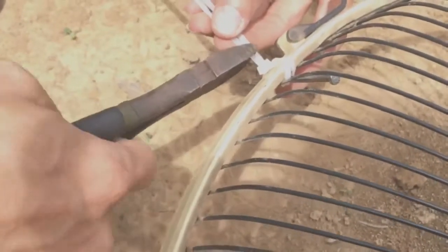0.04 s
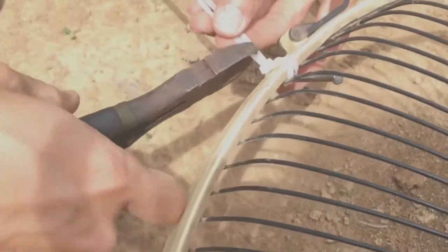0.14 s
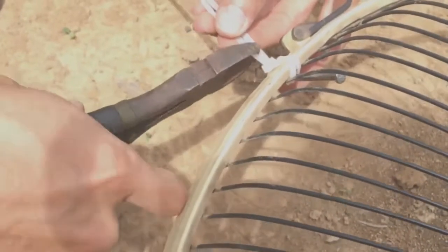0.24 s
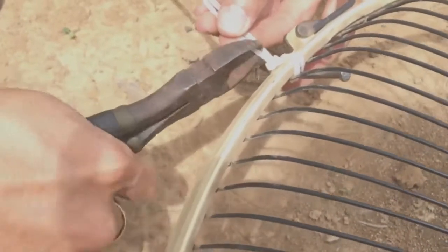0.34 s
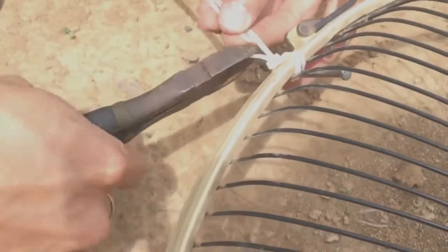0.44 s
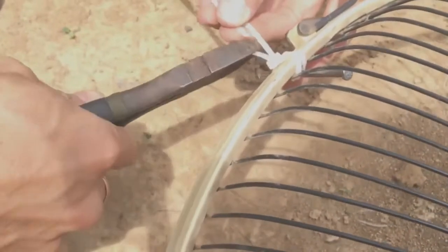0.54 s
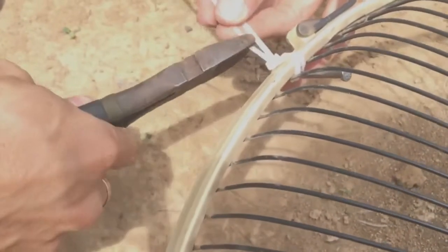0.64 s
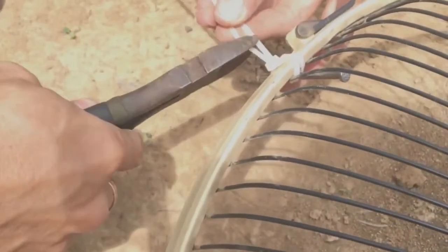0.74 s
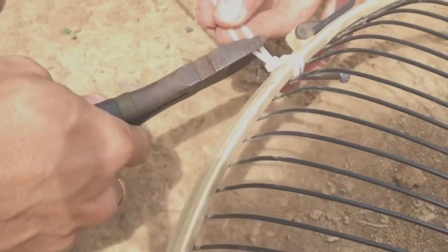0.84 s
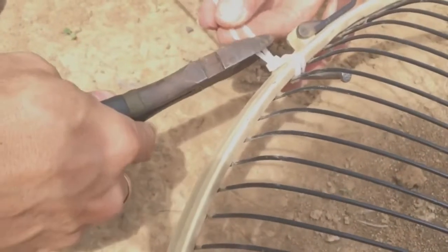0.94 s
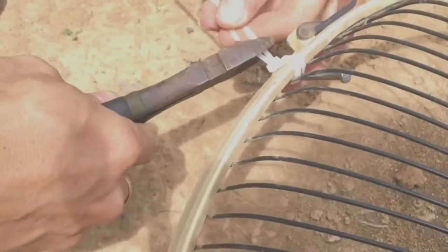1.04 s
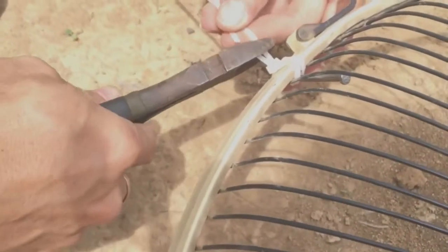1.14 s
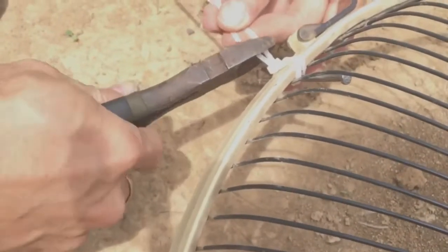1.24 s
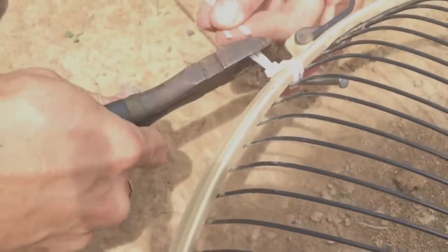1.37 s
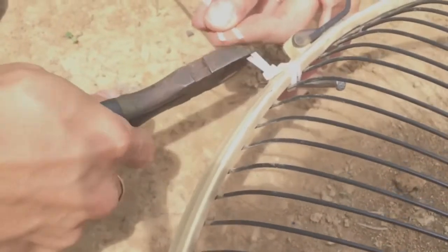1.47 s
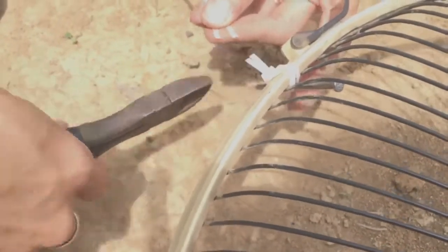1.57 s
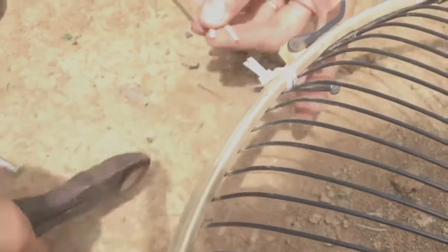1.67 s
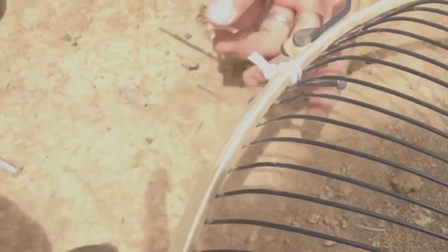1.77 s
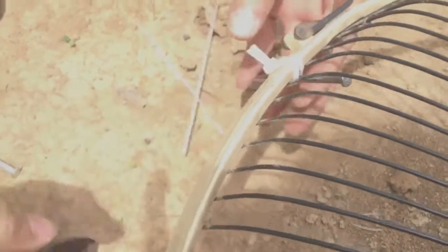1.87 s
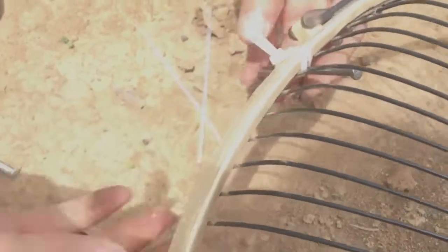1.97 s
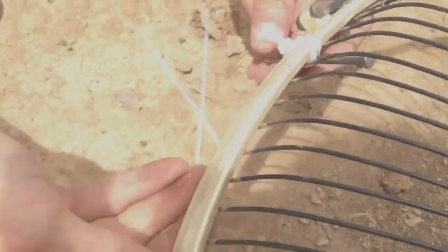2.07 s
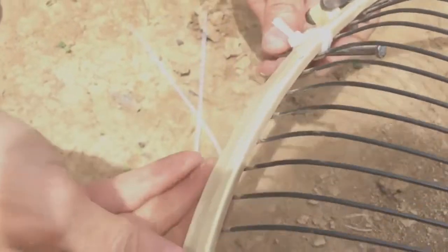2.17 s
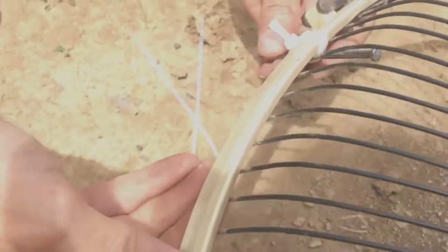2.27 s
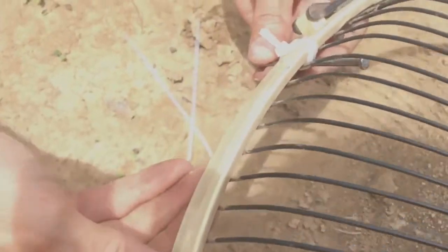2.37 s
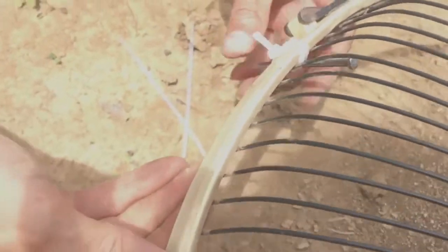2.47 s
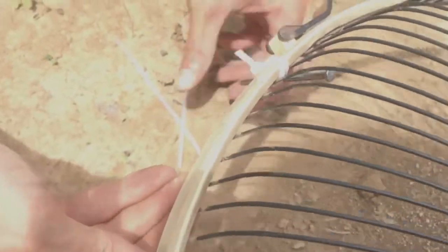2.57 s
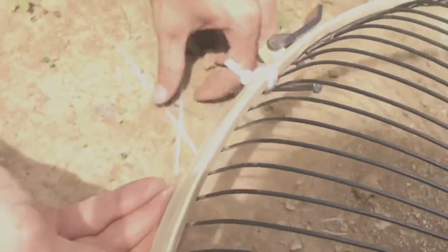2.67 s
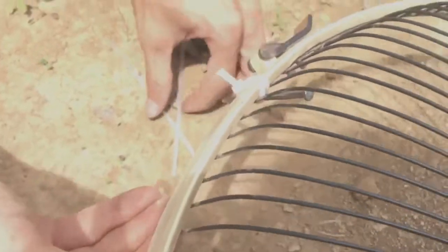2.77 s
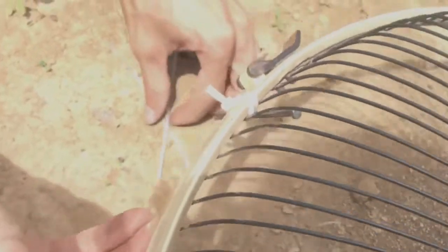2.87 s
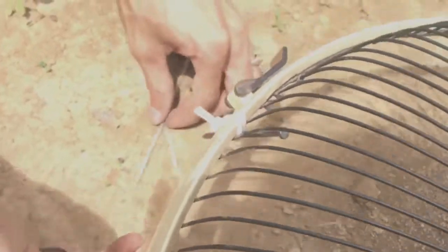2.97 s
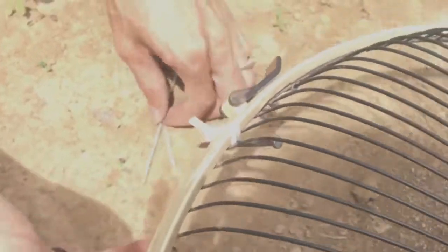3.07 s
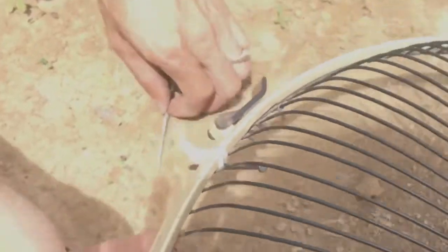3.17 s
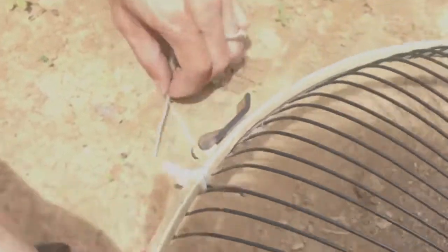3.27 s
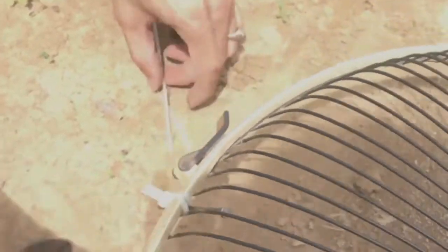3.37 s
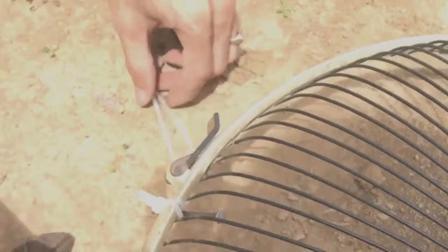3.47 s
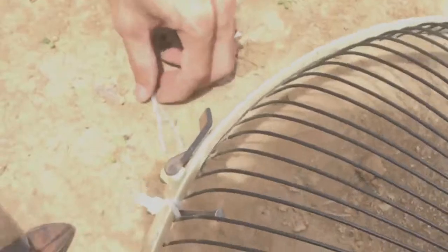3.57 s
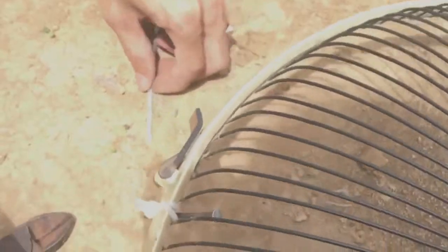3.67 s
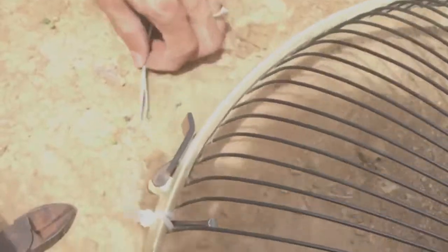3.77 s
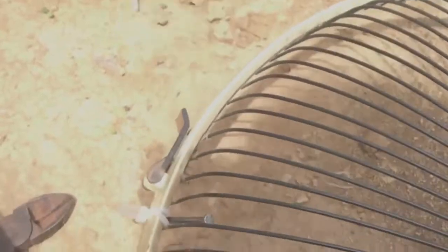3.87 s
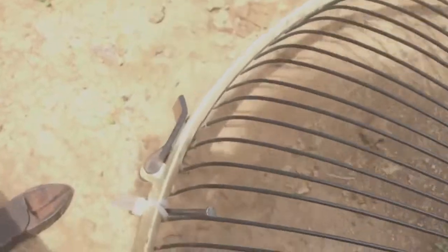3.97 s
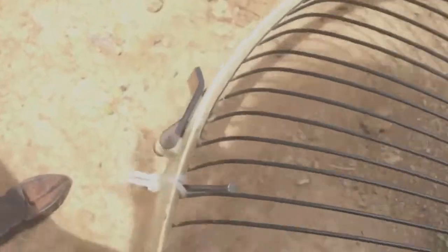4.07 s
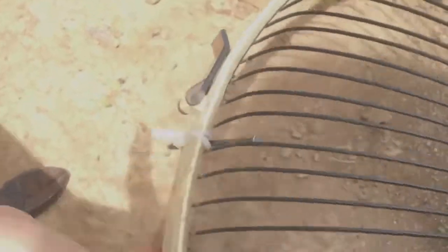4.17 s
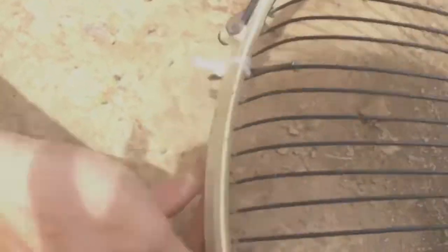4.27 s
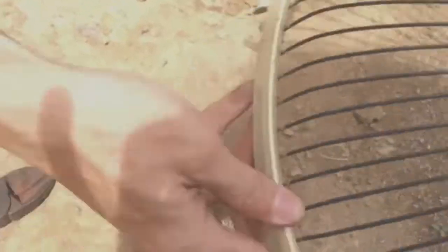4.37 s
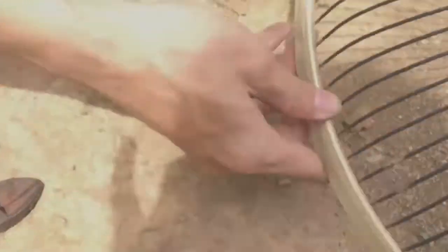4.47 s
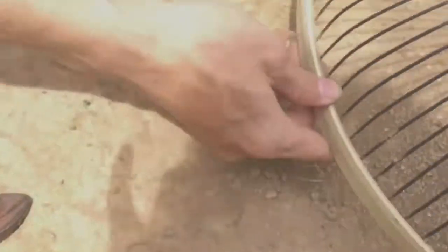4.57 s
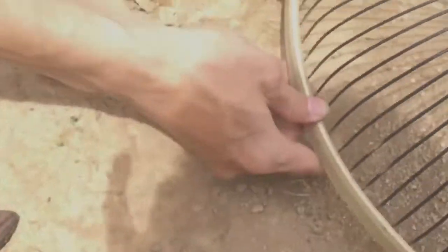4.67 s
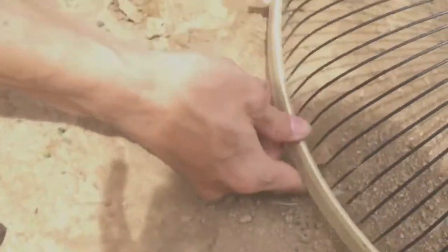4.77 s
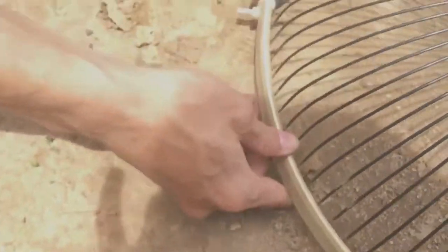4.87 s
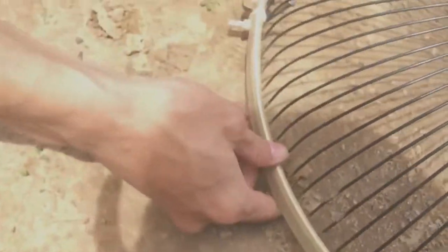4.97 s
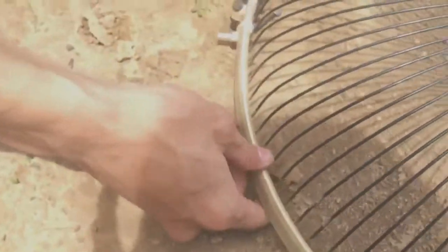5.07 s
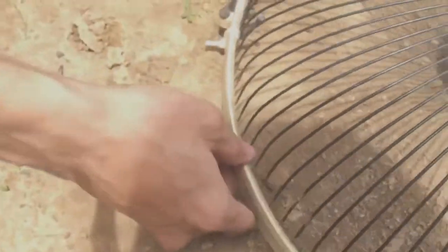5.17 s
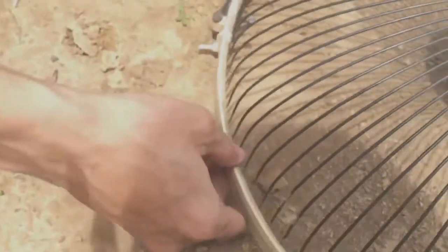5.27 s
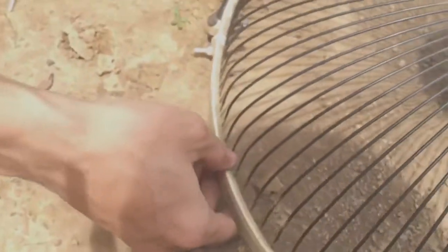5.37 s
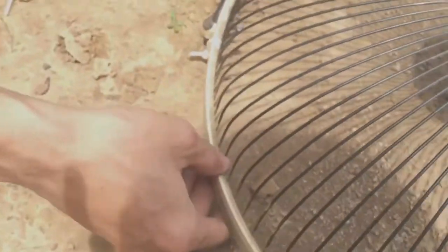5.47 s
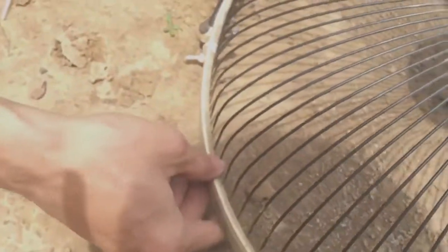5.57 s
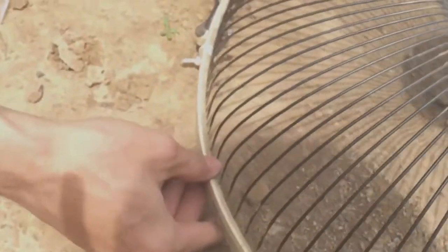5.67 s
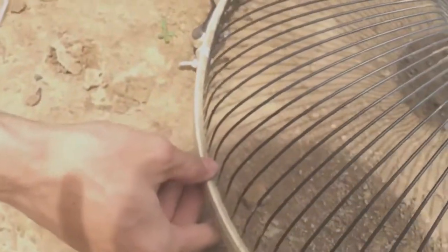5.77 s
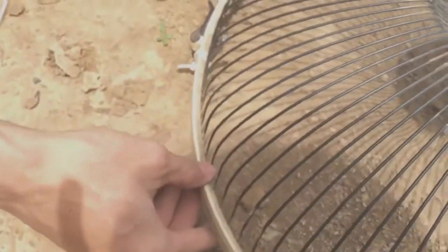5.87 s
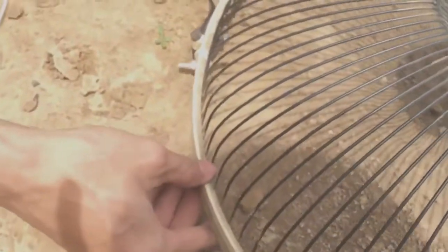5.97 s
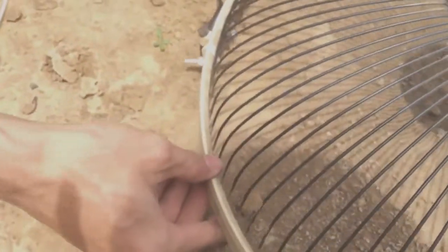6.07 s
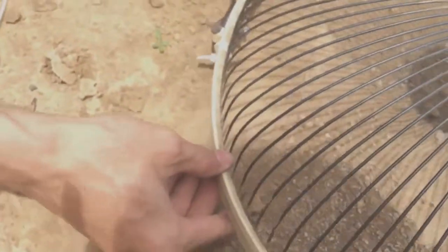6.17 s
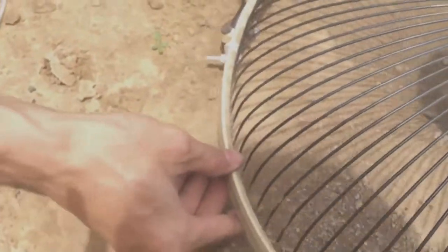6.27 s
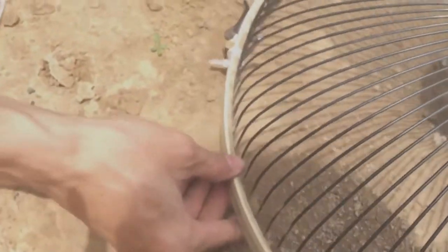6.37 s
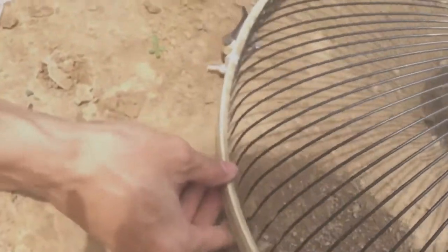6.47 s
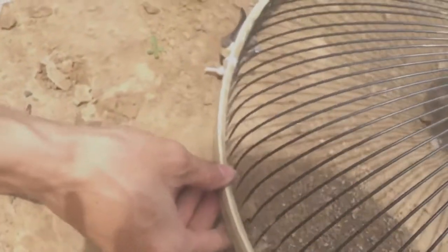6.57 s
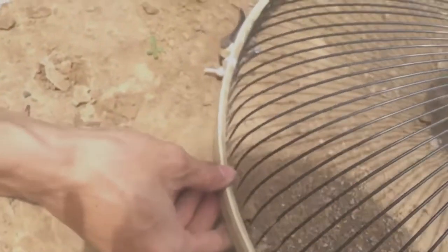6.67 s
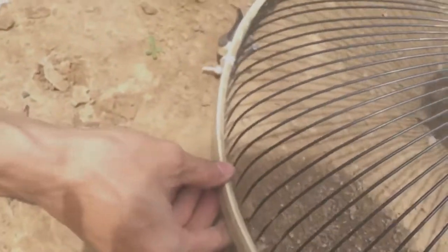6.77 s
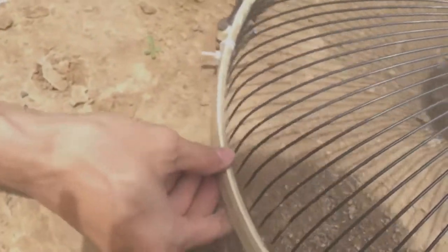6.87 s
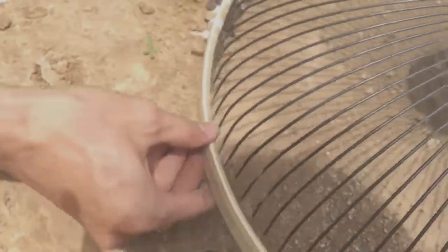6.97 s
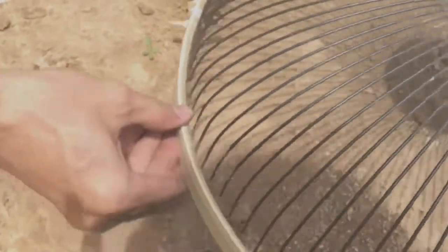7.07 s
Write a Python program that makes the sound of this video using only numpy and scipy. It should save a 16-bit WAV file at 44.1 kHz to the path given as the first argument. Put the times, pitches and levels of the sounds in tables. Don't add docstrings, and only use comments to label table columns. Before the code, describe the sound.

Close outdoor handling: cutters crack twice through plastic tie tails, the tool lands on soil, and a wire guard scrapes across grit above distant droning.

```python
import sys
import numpy as np
from scipy import signal
from scipy.fft import rfft, irfft
from scipy.io import wavfile
from scipy.ndimage import uniform_filter1d

SR = 44100
rng = np.random.default_rng(int(sys.argv[2]) if len(sys.argv) > 2 else 0)


def dump_mix(stems):
    frames = np.atleast_2d(stems).T
    limited = np.clip(frames, -1, 1)
    pcm = np.round(limited * 32767).astype(np.int16)
    wavfile.write(sys.argv[1], SR, pcm)


def voltage_ratio(decibels):
    exponent = np.asarray(decibels, float) / 20
    return 10 ** exponent


N = 313992
T = np.arange(4096) / SR

# start_s, peak_db, chatter_s, chatter_db, creak_db
SNIPS = [
    (0.3617, .4, .0046, -2.5, -27),
    (1.4213, .5, .0045, -4.5, -31),
]
# delay_s, level_db
REBOUNDS = [
    [(.00222, -8), (.003552, -3)],
    [(.001452, -10), (.002904, -9)],
]
# steel_db, snap_db, plastic_db, lowest_steel_hz
SNIP_MIX = [
    (-1, -5, -4, 1300),
    (-3, -4, -2.5, 960),
]
# pitch_hz, width_hz, level_db
JAWS = [
    [(1400, 115, -4), (1850, 260, -8), (2262, 130, -7), (3700, 150, -6), (5600, 200, -1), (6940, 200, -11),
     (7750, 300, -3), (8410, 200, -2), (9600, 200, -7), (9010, 170, 4), (10000, 150, -10.5),
     (11600, 130, -12.5), (12600, 110, -14), (15660, 130, -20)],
    [(1180, 400, -10), (1990, 120, 4.5), (2200, 110, -1), (3960, 110, -11), (4450, 250, -13),
     (5960, 210, -5.5), (6930, 200, -8), (8200, 300, -3), (8950, 190, -3), (9650, 280, -3),
     (10800, 180, -12.5), (12600, 300, -1), (13030, 320, 4.5), (15500, 100, -12.5)],
]
# pitch_hz, level_db (per Hz)
PLASTIC = [
    [(520, -27), (1150, -36), (1390, -22), (1650, -17), (2290, -9), (2870, -23), (3670, -6.5), (5210, -21),
     (5510, -7), (8450, -7.5), (9020, -1), (10400, -12), (12500, -5), (15600, -12), (17000, -25)],
    [(800, -36), (1100, -6), (1640, -15), (1980, 0.5), (2290, 0.5), (2850, -22), (3990, -5.5),
     (4900, -20.5), (5740, -10.5), (7200, -10), (8200, -1), (9520, -4), (11300, -22), (12700, -5.5),
     (14500, -16), (15500, -12), (16200, -31.5), (17000, -50)],
]
# rim_db, wires_db
SNIP_SHAKE = [
    (-70, -55),
    (-41.5, -55),
]

# pitch_hz, level_db, t60_s
RIM = [(998, -1, .22), (1064, 1, .19), (1140, 1, .09), (1330, -1, 0.07), (1870, -7, 0.25), (2030, -10, 0.2)]
# pitch_hz, level_db, t60_s
WIRES = [(3960, -7.5, .6), (4047, -7.5, .6), (5220, -8, 0.35), (5450, -10, 0.22), (6620, -13, 0.21),
         (7970, -12, 0.14), (8300, -12.5, .3)]

# start_s, peak_db, centre_hz, bright_edge_db
TICKS = [(.3382, -34, 8994, 0), (.4764, -27, 5600, 5), (.3583, -32, 8500, -3), (1.389, -55, 11000, 0),
         (1.4055, -46, 10000, 0), (.0428, -52, 1770, -8), (.0712, -53, 6000, 0), (.3217, -55, 4000, -8),
         (.1905, -47.5, 2600, -16), (.4174, -48, 3960, -8), (.5314, -48, 3960, -8), (.8995, -42, 3600, -6),
         (1.0464, -51, 2500, -10), (1.168, -53, 2600, -13), (1.8448, -41, 3830, -1.5),
         (1.8664, -52, 8000, -2), (1.9599, -43, 2000, -5), (2.0155, -42, 1810, -8), (2.0244, -46, 7000, 0),
         (2.0994, -51, 1626, -8.5), (2.4189, -47, 3940, 1), (2.4368, -45, 3950, -6.5),
         (2.4474, -46.5, 3750, -3), (2.6409, -42, 3900, -2), (2.6559, -44, 1640, -13),
         (2.989, -45.5, 1920, 2), (3.1343, -49, 3500, 0), (3.994, -51, 8000, 0), (4.499, -50, 9000, 0),
         (4.684, -52, 10000, 0), (4.998, -51, 9500, 0), (5.414, -56, 9500, 0), (6.616, -54, 10000, 0),
         (6.71, -55, 10000, 0), (2.898, -56, 9000, 0), (3.049, -57, 9000, 0), (4.1175, -41, 3700, -8),
         (4.326, -29.5, 3970, -5), (4.3547, -28, 3500, -4), (4.8965, -53, 1550, -7.5),
         (5.433, -55, 5000, -3), (5.963, -57, 3600, -11)]
# start_s, peak_db, centre_hz,
# bright_edge_db
SNAGS = [(3.4288, -49, 1860, -8), (3.46, -47, 3600, -6), (3.757, -40, 3760, -12), (3.578, -46, 5000, -4),
         (3.601, -44, 1900, -14), (3.622, -43, 1800, -14), (3.647, -42, 3900, -13), (3.688, -43, 3600, -13),
         (3.714, -43, 3400, -13), (3.792, -44, 2500, -10), (4.0512, -47, 1500, -12),
         (4.0732, -45, 5000, -8), (4.0986, -43, 1800, -10), (4.1625, -42, 6000, -6),
         (4.2208, -39, 7500, -6), (4.2782, -42, 1300, -8), (4.3, -39, 1600, -8), (4.344, -33, 1100, -12),
         (4.365, -31, 1150, -12), (4.122, -41, 1400, -8), (4.172, -41, 3800, -2), (4.214, -36, 1050, -14),
         (4.2034, -42, 1200, -8), (4.381, -32, 5500, -2), (4.404, -37, 2000, -8), (4.4418, -42, 5000, -6)]
TICK_T60_S, T60_S_PER_BRIGHT_DB = .015, .001
TICK_RING_DB, RING_DB_PER_BRIGHT_DB = -36, .6

# start_s, peak_db, pitch_hz, t60_s, contact_s
THUDS = [
    (.3635, -31, 430, .02, .0002),
    (.363, -31, 630, .02, .0002),
    (1.4229, -36, 340, .015, .0003),
    (0.364, -21, 255, .028, 0.00033),
    (1.4229, -26, 213, .03, 0.0005),
    (1.854, -30, 150, 0.037, .001),
    (1.918, -23.5, 172, 0.045, 0.0004),
    (2.015, -31, 186, .05, .0005),
    (2.0203, -23.5, 186, 0.055, 0.00049),
    (2.641, -38, 200, 0.062, 0.0015),
]
# start_s, peak_db, pitch_hz, t60_s, contact_s
RECOIL = (.3635, -21, 62, .055, .0004)
# start_s, peak_db, t60_s
LAY_DOWN = (1.9111, -20, 0.027)
# pitch_hz, level_db (per Hz)
STONE = [(290, -35), (500, -16), (1570, -14), (1950, -12), (2220, -4), (2680, -7.5), (3330, -21.5),
         (3630, -14), (4320, -34), (4710, -23.5), (6870, -23), (8530, -31.5), (15900, -40)]
# start_s, pitch_hz, level_db, t60_s
SHORT_RINGS = [(.478, 1990, -51, .07), (.478, 2250, -47, .03), (4.356, 3500, -38, .04), (1.912, 1350, -32, .025),
               (1.912, 930, -36, .025), (1.912, 700, -37, .025), (1.912, 420, -36, .02), (1.868, 2850, -61, .09),
               (1.848, 2850, -57.5, 0.18), (1.912, 2220, -30, .02), (1.912, 3700, -57.5, 0.088)]
# start_s, pitch_hz, level_db, t60_s
NUDGES = [(4.43, 360, -47, 0.12), (7.07, 1060, -48, 0.08), (2.655, 1400, -45.5, 0.0067),
          (5.38, 2500, -57, .01), (5.39, 2050, -57, .01), (5.51, 1450, -53, 0.03), (4.58, 9550, -66, .015),
          (4.64, 9550, -64, .012), (4.65, 3050, -63, .04), (5.18, 4020, -70, .4), (5.96, 4050, -71, .02),
          (0.066, 866, -47, 0.015), (.155, 800, -52, .012), (.225, 1050, -50, .012), (.225, 2050, -54, .01),
          (.212, 4000, -56, .005), (.13, 5300, -64, .006), (5.42, 1700, -57, .008)]

# peak_s, level_db, fade_20db_s, rim_pressure_db
BRUSHES = [(0.0, -71, .02, -14), (.046, -66, .045, -9), (.39, -64.5, .25, -10), (.485, -66, .12, -14),
           (.895, -69, .25, -9), (1.045, -72.5, .18, -13), (1.171, -69, .04, -8), (1.45, -60, .2, -4),
           (1.865, -65, .05, -11), (1.962, -66, .055, 0), (2.023, -67, .045, -12), (2.099, -66, .15, -3),
           (2.23, -61.5, .06, -9), (2.449, -64, .03, -10), (2.997, -70, .04, -10), (3.143, -69, .12, -10),
           (4.47, -63, .14, -12), (2.645, -63, .04, -7), (3.31, -66, .05, -12), (5.76, -82, 1.2, -11),
           (5.19, -76, .07, -12), (6.86, -75, .09, -9.5), (6.92, -78.5, .2, -8), (7.12, -72, .05, -10)]
BRUSH_RISE_S = .03
# start_s, length_s, level_db, rim_pressure_db, fine_dust_db
SLIDES = [(.152, .025, -69, -10, -2), (.226, .028, -61, -8, -4), (.065, .03, -74, -8, -3),
          (.54, .2, -69, -8, -7), (1.28, .12, -76, -5, -4), (1.6, .23, -68, -5, -6.5),
          (2.18, .04, -71, -8, -5), (2.42, .02, -70, -11, -7), (2.55, .08, -73, -7, -5),
          (2.68, .05, -75, -7, -8), (2.86, .46, -70.5, -13, -4), (4.62, .14, -70, -15, -1),
          (4.8, .08, -76, -14, -1), (4.9, .14, -71, -12, -1), (5.1, .2, -76, -10, -3),
          (5.36, .1, -80, -13, -4), (6.5, .22, -72.5, -8, -1), (7.03, .08, -82, -10, -3)]
SLIDE_SWELL_S, SLIDE_FADE_S = .035, .06
# time_s, level_db, rim_pressure_db
DRAGS = [
    [(3.38, -70, -16), (3.44, -62, -8), (3.5, -58, -12), (3.604, -52, -12), (3.7, -52, -13),
     (3.776, -52.5, -11), (3.85, -59, -8), (3.96, -72.5, -6.5)],
    [(3.96, -72.5, -6.5), (4.116, -53.5, -15), (4.195, -60, -9), (4.212, -51, 4), (4.276, -51.5, 0),
     (4.358, -42, -.5), (4.426, -56, 3), (4.457, -55, -12), (4.466, -68, -12)],
]
BRUSH_FINE_DB, DRAG_FINE_DB = -6, -5
# pitch_hz, level_db (per Hz)
GRIT = [(880, -35.5), (1500, -5), (1960, 0.5), (2480, -8.5), (2990, -8), (3510, -1.5), (4490, -4.5),
        (5010, -8.5), (5750, -4.5), (7510, -9), (9600, -7), (10300, -12), (11000, -8), (14300, -6.5),
        (15900, -15)]
# pitch_hz, width_hz, level_db
SINGING = [(1110, 200, -15), (1400, 200, -18), (1980, 250, -13), (3530, 300, -13), (4000, 200, -17),
           (4500, 350, -13), (5630, 350, -13), (6580, 500, -15), (8750, 1200, -12), (11700, 1200, -14),
           (13500, 2500, -11)]
CATCH_DB, CATCH_HZ = 5, 50

# centre_s, half_length_s, level_db, pitch_hz
INSECTS = [(3.32, .06, -72, 8050), (5.35, .05, -71, 8200), (5.58, .06, -71.5, 7980), (5.78, .06, -79, 7600),
           (5.93, .08, -79, 8150), (6.17, .08, -80, 8100), (6.42, .06, -80, 8150), (7.1, .05, -75, 7980)]
INSECT_RISE_HZ_PER_S = 2000
# start_s, length_s, level_db, start_hz, end_hz, slur_s
BIRD = (5.876, .08, -73, 3550, 4060, .011)
BIRD_WAVER_DB, BIRD_WAVER_HZ, BIRD_FADE_S = 5, 28, .09

# pitch_hz, level_db (per Hz)
DRONE = [(11, -45.5), (18, -15.5), (32, 0), (54, 1.5), (119, -5), (141, -9), (183, -10), (383, -28),
         (421, -31.5), (450, -28.5), (580, -57), (990, -120)]
# pitch_hz, width_hz, level_db
HUM = [(50.5, 13, -51.5), (83.6, 14, -53), (120.7, 12, -52.5), (200, 43, -60)]
# pitch_hz, width_hz, level_db, centre_s, half_length_s
WHINE = (474, 26, -67, 6.13, 0.24)
# time_s, level_db
LOAD = [(0.0, -45), (0.2, -44), (0.38, -48), (0.55, -48), (0.75, -43), (1.33, -48), (1.96, -43),
        (2.28, -46), (2.83, -44), (3.29, -46), (3.79, -44.5), (5.21, -46), (5.47, -45), (6.25, -42.5),
        (6.56, -46), (7.12, -45)]
DEEP_SHARE, UPPER_SHARE, UPPER_FADE_DB_PER_S = .9, .7, .95
# pitch_hz, level_db (per Hz)
AIR = [(150, -29), (250, -3), (428, -12.5), (459, -11.5), (606, -11), (953, -12.5), (1130, -15.5),
       (1260, -12.5), (2230, -20), (2610, -27.5), (6670, -39.5), (7530, -34.5), (9700, -38), (10300, -44),
       (11000, -38), (15900, -36.5)]

GAP_SHARE, GAP_DB, GAP_S, QUIET_DB = .4, -10, .003, -66
TOP_HZ = 15800


def level(x, db):
    return x * voltage_ratio(db) / np.sqrt(np.mean(x ** 2))


def peak(x, db):
    return x * voltage_ratio(db) / np.abs(x).max()


def add(out, x, s):
    i = int(s * SR)
    out[i:i + len(x)] += x[:len(out) - i]


def curve(table):
    s, *columns = np.transpose(table)
    return [np.interp(np.arange(N) / SR, s, c) for c in columns]


def walk(rate):
    k = int(SR / rate)
    steps = np.repeat(rng.standard_normal(N // k + 1), k)
    return 1.3 * uniform_filter1d(uniform_filter1d(steps, k), k)[:N]


def colour(x, shape):
    hz, db = np.transpose(shape)
    grid_hz = np.linspace(1, SR / 2, 4097)
    log_gain = np.interp(np.log(grid_hz), np.log(hz), db) * np.log(10) / 20
    cep = irfft(log_gain)
    cep[1:len(cep) // 2] *= 2
    cep[len(cep) // 2 + 1:] = 0
    response = irfft(np.exp(rfft(cep)))
    return signal.fftconvolve(x, response)[:len(x)]


def ring(x, hz, t60):
    pole = np.exp(2j * np.pi * hz / SR - np.log(1000) / (t60 * SR))
    return signal.lfilter([0, pole.imag], [1, -2 * pole.real, abs(pole) ** 2], x)


def band(x, hz, width):
    edges = np.clip([hz - width / 2, hz + width / 2], 15, SR * .45)
    return signal.sosfilt(signal.butter(2, edges, "band", fs=SR, output="sos"), x)


def even(x):
    tones = rfft(x)
    return irfft(tones / np.sqrt(uniform_filter1d(np.abs(tones) ** 2, size=130)))


def jog(push, s, rim_db, wire_db):
    add(push[0], voltage_ratio([rim_db]), s)
    add(push[1], voltage_ratio([wire_db]), s)


def snips(push):
    out, lead = np.zeros(N), .008
    t = T - lead
    for cut, jaws, plastic, shake, bounces, mix in zip(SNIPS, JAWS, PLASTIC, SNIP_SHAKE, REBOUNDS, SNIP_MIX):
        s, db, chatter_s, chatter_db, creak_db = cut
        steel_db, snap_db, plastic_db, low_hz = mix
        slam = np.exp(-(t / .0008) ** 2)
        chatter = voltage_ratio(chatter_db) / (1 + np.exp((t - chatter_s) / .0012))
        chatter *= 1 - .7 * np.exp(-((t - .0012) / .0007) ** 2)
        creak = voltage_ratio(creak_db) * np.exp(np.minimum(t, 0) / 0.0044)
        blow = even(rng.standard_normal(len(T)) * np.where(t < 0, creak, slam + chatter))
        hits = np.zeros(len(T))
        for delay, hit_db in [(0, 0)] + bounces:
            hits[round((lead + delay) * SR) + 4] += voltage_ratio(hit_db)
        strike = .3 * blow / np.sqrt(np.sum(blow ** 2)) + hits
        steel = sum(voltage_ratio(g) * ring(strike, hz, 2.2 / width) for hz, width, g in jaws)
        steel = signal.sosfilt(signal.butter(4, low_hz, "high", fs=SR, output="sos"), steel)
        splinter = peak(colour(blow, plastic), plastic_db)
        snap = peak(colour(hits, plastic), snap_db)
        add(out, peak(splinter + snap + peak(steel, steel_db), db), s - lead)
        scatter = rng.standard_normal(len(T)) * np.exp(-T / .011)
        add(out, peak(band(scatter, 7500, 11500), db - 27), s + .002)
        jog(push, s, *shake)
    return out


def guard(push):
    out = np.zeros(N)
    for x, modes, spread in zip(push, (RIM, WIRES), (.014, .009)):
        for hz, db, t60 in modes:
            detune = np.linspace(-1.5, 1.5, 5) + .3 * rng.standard_normal(5)
            signs = (1, -1, 1, 1, -1)
            for d, sign in zip(detune, signs):
                out += voltage_ratio(db) * sign * ring(x, hz * (1 + spread * d), min(t60, .6))
    return out


def handling():
    t = np.arange(0, N / SR + .002, .001)
    moves = []
    for s, db, fade, press_db in BRUSHES:
        away = np.maximum((s - t) / BRUSH_RISE_S, (t - s) / fade)
        moves.append((db - 20 * away, press_db, BRUSH_FINE_DB))
    for s, length, db, press_db, fine_db in SLIDES:
        away = np.maximum((s - t) / SLIDE_SWELL_S, (t - s - length) / SLIDE_FADE_S)
        moves.append((db - 20 * np.maximum(away, 0), press_db, fine_db))
    for pull in DRAGS:
        s, db, press_db = np.transpose(pull)
        outside = np.maximum(np.maximum(s[0] - t, t - s[-1]), 0)
        pull_db = np.interp(t, s, db) - 20 * outside / BRUSH_RISE_S
        moves.append((pull_db, np.interp(t, s, press_db), DRAG_FINE_DB))
    rustle, fine, press = 1e-5, 5e-6, 1e-6
    for db, press_db, fine_db in moves:
        gain = voltage_ratio(np.maximum(db, -140))
        rustle = rustle + gain
        fine = fine + gain * voltage_ratio(fine_db)
        press = press + gain * voltage_ratio(press_db)
    return curve(20 * np.log10(np.c_[voltage_ratio(t), rustle, fine / rustle, press / rustle]))


def drag(push):
    rustle_db, fine_db, press_db = handling()
    grain_db = 2.4 * np.minimum(rng.exponential(size=N), 5.5)
    grains = rng.standard_normal(N) * voltage_ratio(grain_db)
    effort = voltage_ratio(rustle_db + .7 * walk(40) + 1.8 * walk(250))
    pressed = effort * voltage_ratio(press_db)
    rub = level(band(grains, 1200, 800), 0) * pressed
    add(push[0], rub * voltage_ratio(-42.5 + .4 * press_db + 2.5 * walk(70)), 0)
    add(push[1], level(grains, -56.5) * effort, 0)
    grit = level(colour(grains, GRIT), .5)
    for hz, width, db in SINGING:
        grit += level(band(rng.standard_normal(N), hz, width) * voltage_ratio(CATCH_DB * walk(CATCH_HZ)), db)
    coarse = signal.sosfiltfilt(signal.butter(2, 9000, fs=SR, output="sos"), grit)
    tilt = voltage_ratio(np.clip(fine_db, -9, -1) + 4.0)
    hiss = (coarse / tilt + (grit - coarse) * tilt) * effort
    rumble = level(band(grains, 600, 550), -4.5) * pressed
    return hiss + rub * voltage_ratio(-3.5) + rumble


def ticks(push):
    out = np.zeros(N)
    for s, db, hz, bright_db in TICKS + SNAGS:
        t60 = TICK_T60_S - T60_S_PER_BRIGHT_DB * bright_db
        ring_db = TICK_RING_DB - RING_DB_PER_BRIGHT_DB * bright_db
        shape = (1 - np.exp(-T / 0.00037)) * np.exp(-np.log(1000) * T / max(t60, .004))
        burst = rng.standard_normal(len(T)) * shape
        width = hz * np.clip(1.9 + .08 * bright_db, .5, 1.6)
        body = level(band(burst, hz, width), 0)
        edge = level(band(burst, 13000, 10500), bright_db)
        add(out, peak(body + edge, db), s)
        jog(push, s, db + ring_db + 6, db + ring_db)
    return out


def thuds():
    out = np.zeros(N)
    for s, db, hz, t60, contact in THUDS:
        add(out, peak(ring(np.exp(-(T / contact - 3) ** 2), hz, t60), db), s - 2 * contact)
    s, db, hz, t60, contact = RECOIL
    add(out, -peak(ring(np.exp(-(T / contact - 3) ** 2), hz, t60), db), s - 3 * contact)
    return out


def lay_tool_down():
    out = np.zeros(N)
    s, db, t60 = LAY_DOWN
    knock = rng.standard_normal(len(T)) * np.exp(-np.log(1000) * T / t60)
    add(out, peak(colour(even(knock) * (T < 2 * t60), STONE), db), s)
    for s, hz, db, t60 in SHORT_RINGS:
        add(out, peak(ring(np.exp(-T / .0001), hz, t60), db), s)
    return out


def nudges():
    out = np.zeros(N)
    for s, hz, db, t60 in NUDGES:
        rub = rng.standard_normal(len(T)) * np.sin(np.pi * (T / T[-1]) ** 0.39)
        fade_out = np.minimum(1, (T[-1] - T) / .01)
        add(out, peak(ring(rub, hz, t60) * fade_out, db), s)
    return out


def insects():
    rasp = level(band(rng.standard_normal(N), 150, 280), 0)
    chirps = np.zeros(N)
    for s, half, db, hz in INSECTS:
        t = np.arange(N) / SR - s
        swell = np.exp(-(t / half) ** 2)
        chirps += voltage_ratio(db) * swell * np.sin(2 * np.pi * (hz + INSECT_RISE_HZ_PER_S * t / 2) * t)
    return chirps * rasp * np.sqrt(2)


def bird():
    s, length, db, low_hz, high_hz, slur = BIRD
    t = np.arange(N) / SR - s
    hz = high_hz - (high_hz - low_hz) * np.exp(-np.maximum(t, 0) / slur) + BIRD_WAVER_HZ * walk(70)
    db = db + BIRD_WAVER_DB * walk(70)
    breath = np.clip(np.minimum(t / slur, (length - t) / BIRD_FADE_S) + 1, 0, 1) ** 2
    return voltage_ratio(db) * breath * np.sin(2 * np.pi * np.cumsum(hz) / SR)


def machine():
    t = np.arange(N) / SR
    hum = sum(level(band(rng.standard_normal(N), hz, width), db) for hz, width, db in HUM)
    drone = level(colour(rng.standard_normal(N), DRONE), -44.5) + hum
    deep = signal.sosfiltfilt(signal.butter(2, 92, fs=SR, output="sos"), drone)
    load_db = curve(LOAD)[0]
    load_db = load_db - load_db.mean()
    deep_db = DEEP_SHARE * load_db
    upper_db = UPPER_SHARE * load_db - UPPER_FADE_DB_PER_S * t
    hz, width, db, centre, half = WHINE
    whine = level(band(rng.standard_normal(N), hz, width), db) * np.exp(-((t - centre) / half) ** 4)
    return deep * voltage_ratio(deep_db - 0.4) + (drone - deep) * voltage_ratio(upper_db + 4.0) + whine


def open_air():
    return level(colour(rng.standard_normal(N), AIR), -58.8) * voltage_ratio(.6 * walk(1.5))


def dropouts(x):
    out, seams = x.copy(), np.arange(800, N, 1024)
    bump = np.exp(-(np.arange(-500, 501) / SR / GAP_S) ** 2)
    for edges in ([2600, 5000], [5000, 9000], [9000, 16000]):
        part = signal.sosfiltfilt(signal.butter(2, edges, "band", fs=SR, output="sos"), x)
        quiet = uniform_filter1d(part[0] ** 2, size=1024)[seams] < voltage_ratio(2 * QUIET_DB)
        depth = np.clip(1.5 - rng.random(len(seams)) / GAP_SHARE * 1.5, 0, 1)
        marks = np.zeros(N)
        marks[seams] = quiet * depth
        sag_db = GAP_DB * signal.fftconvolve(marks, bump, "same")
        out += part * (voltage_ratio(sag_db) - 1)
    return out


def scene():
    push = np.zeros((2, N))
    loud = signal.sosfilt(signal.butter(14, 16000, fs=SR, output="sos"), snips(push))
    faint = ticks(push) + thuds() + lay_tool_down() + nudges() + drag(push)
    faint += guard(push) + insects() + bird() + machine() + open_air()
    faint = signal.sosfilt(signal.ellip(10, .2, 70, TOP_HZ, fs=SR, output="sos"), faint)
    return (loud + faint)[None]


def roll_off(x):
    return signal.sosfilt(signal.butter(12, 17690, fs=SR, output="sos"), x)


def record(dry):
    dry = signal.sosfilt(signal.butter(5, 34, "high", fs=SR, output="sos"), dry)
    dry = dropouts(dry)
    dry = signal.sosfilt(signal.ellip(8, .2, 70, 17300, fs=SR, output="sos"), dry)
    return roll_off(dry)


dry = scene()
out = record(dry)
dump_mix(out)
```